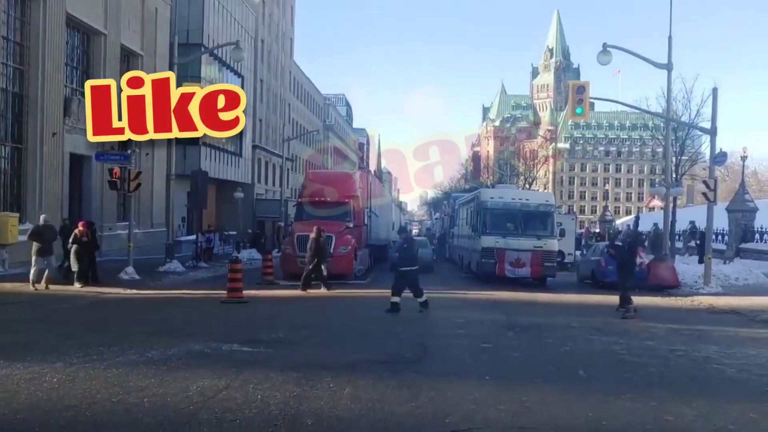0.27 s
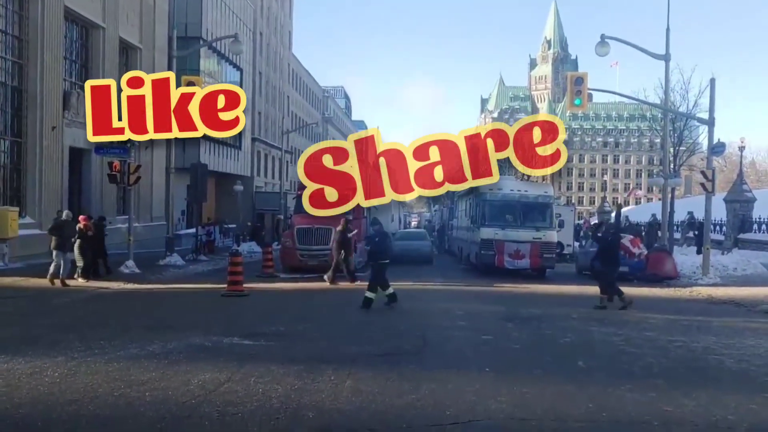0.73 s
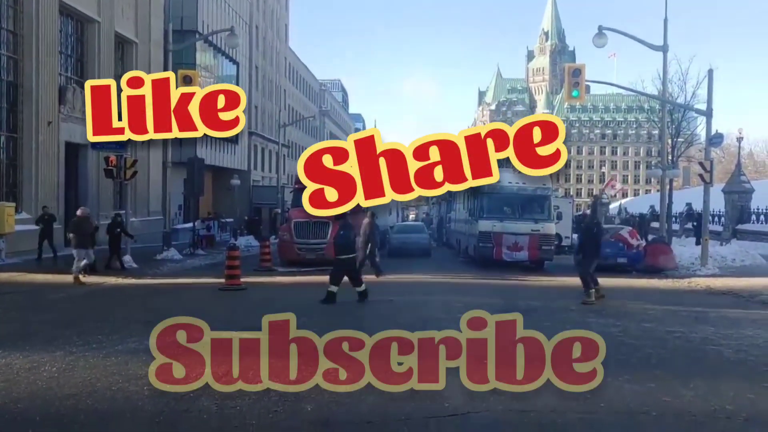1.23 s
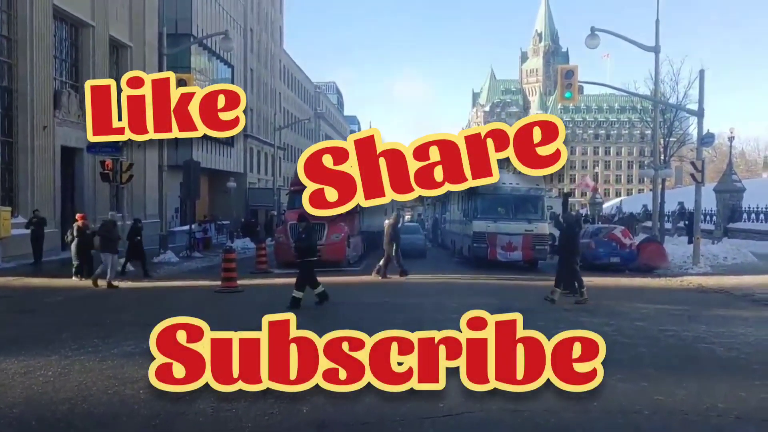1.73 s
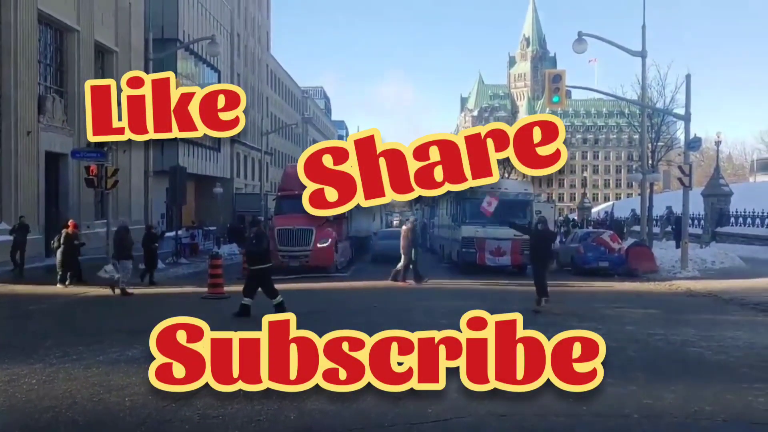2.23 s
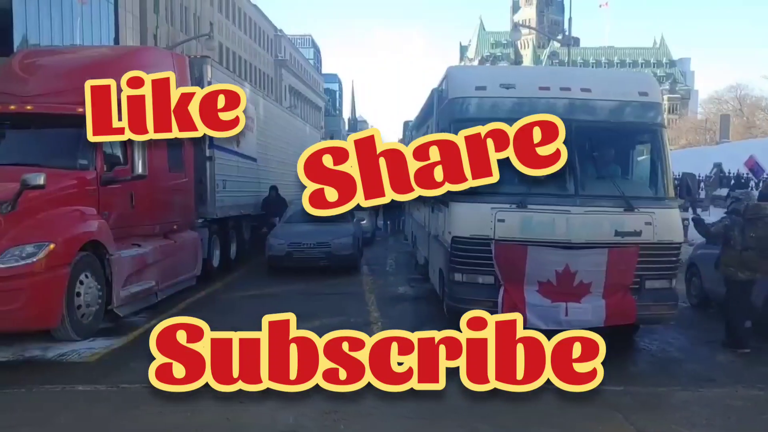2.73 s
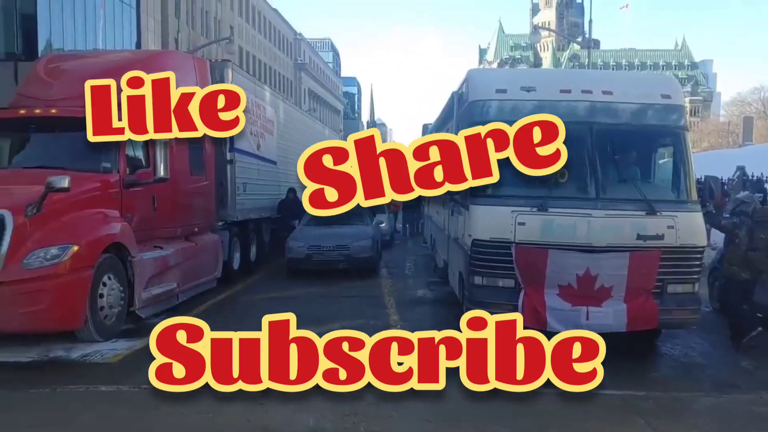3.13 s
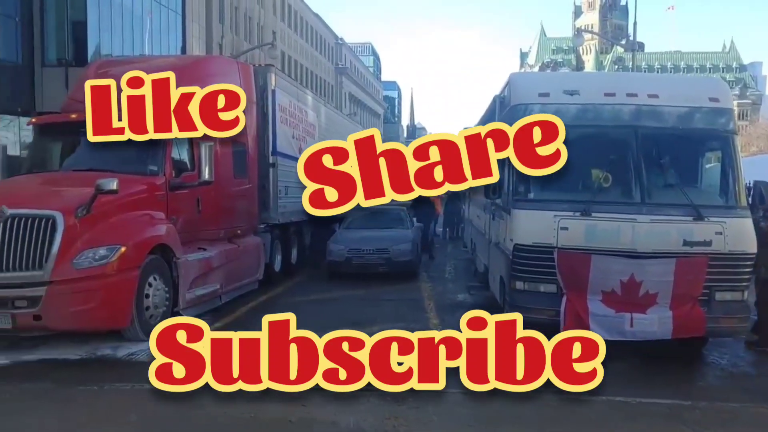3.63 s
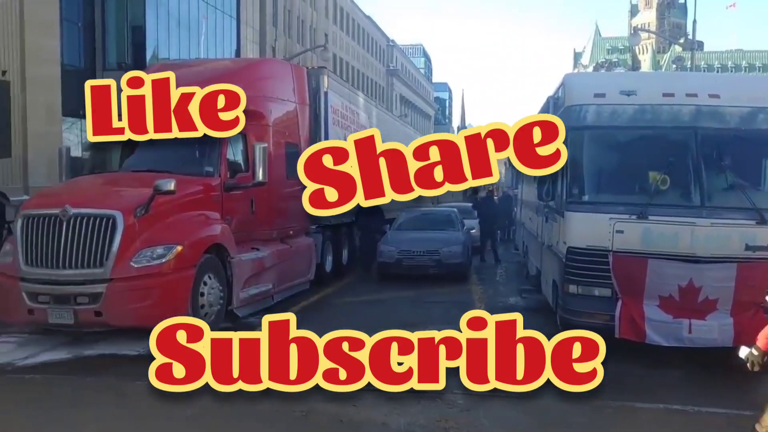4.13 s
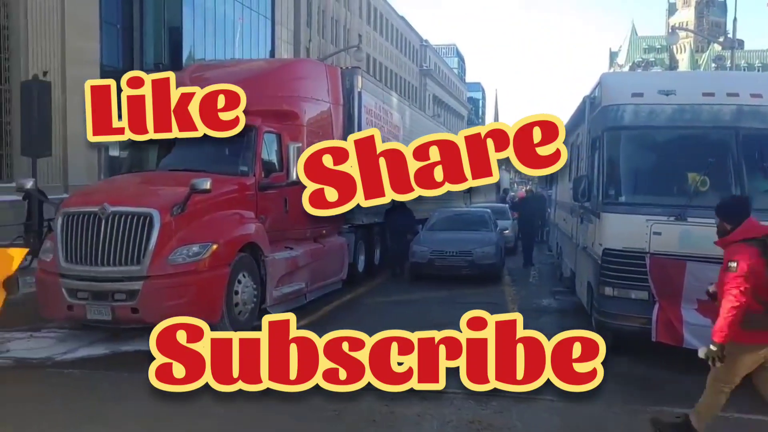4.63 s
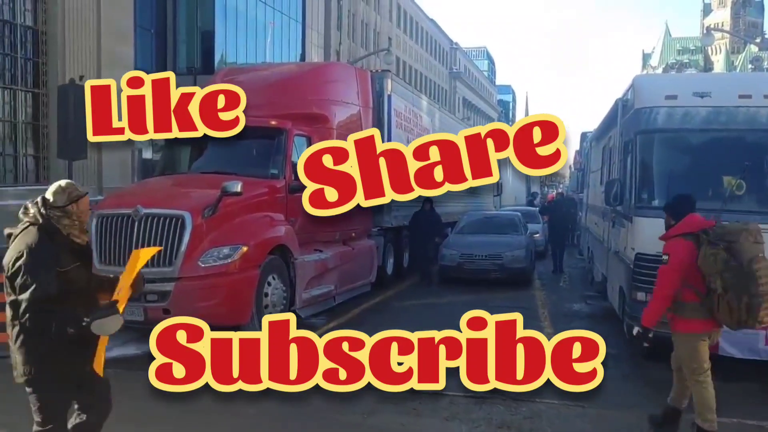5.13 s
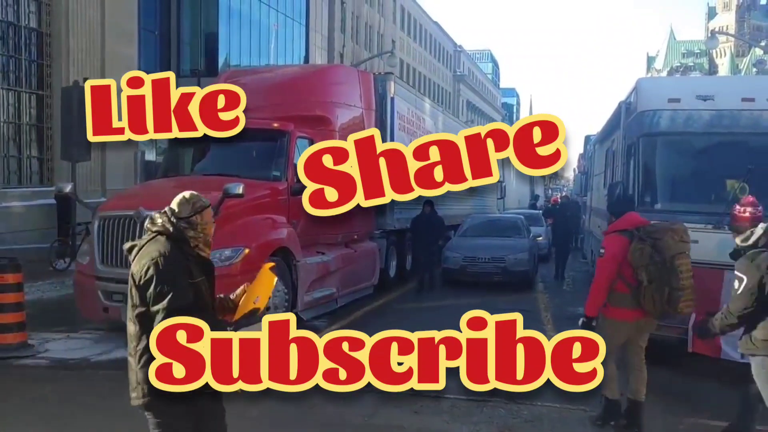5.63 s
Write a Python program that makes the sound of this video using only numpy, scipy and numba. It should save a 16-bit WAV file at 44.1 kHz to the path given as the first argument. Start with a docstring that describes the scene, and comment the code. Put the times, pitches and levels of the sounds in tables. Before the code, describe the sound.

On a city street with idling diesels, a distant three-trumpet truck horn holds a loud chord, stutters as a second horn joins, and cuts dead. After a very brief silence the chord fades in quickly, closer, with a bright single horn and rushing air. The chord stops near the end; the single horn breaks briefly and blows alone. Hand-held phone, stereo, outdoors.

```python
"""Truck air horns in a street of idling diesels, heard by a hand-held phone from two places, a silent cut between.
Far: a three-trumpet chord blows, a two-trumpet horn joins late, and the chord ends in a stutter.
Near: the sound fades in on the same chord, under a bright single trumpet close by, with its rush of air.
That trumpet breaks off as the chord ends, then blows alone. Horns and diesels are sums of drifting tones;
the air and the wash of the street are filtered noise."""
import sys
import numpy as np
from scipy import signal
from scipy.fft import rfft, irfft, next_fast_len
from scipy.io import wavfile
from scipy.ndimage import uniform_filter1d
from numba import njit

SR = 44100
rng = np.random.default_rng(int(sys.argv[2]) if len(sys.argv) > 2 else 0)


def generate_wav(signal):
    """Clip the signal to [-1, 1] and save it as 16-bit WAV at the path in sys.argv[1]."""
    frames = np.transpose(np.atleast_2d(signal))
    scaled = np.clip(frames, -1, 1) * 32767
    pcm = np.round(scaled).astype(np.int16)
    wavfile.write(sys.argv[1], SR, pcm)


N = 258867
STEP = 64  # samples between control values
TOP_HZ = 15720  # the phone passes nothing much above this

# Overtones of each trumpet, first to last; the swell comes of the phone moving:
# (level over the valve curve [dB], left minus right [dB], swell [dB/s])
FAR_LOW = [(-13, -2.5, -0.3), (-11, 3, -0.7), (-15.5, 0, -3), (-27, 3.6, -1), (-6.5, 9, -2),
           (-8.5, -1, 2.3), (-16.5, -12, 4), (-18.5, 8, -1.5), (-48, 4.5, -4)]
FAR_MID = [(-10.5, 0, -4.5), (0.0, -0.5, -0.8), (-3.5, 3, 3.0), (-1.6, -4, 1), (-17, -5, -2), (-17, 4, 0),
           (-19, -3, 3.8), (-37, -2, 1), (-32.5, -6, 1), (-36, -12, 3.4), (-32, 5, 3), (-32, 12, -1.3)]
FAR_TOP = [(-1.45, -4, -0.65), (-8.5, -0.6, 1), (-8.5, -5.5, 4.5), (-11, 4.5, -3.5), (-18.5, -9, 6.5),
           (-20.5, 2, 3.5), (-35, -5, 2), (-24.5, -14, 2), (-39.1, -7, 2), (-27, 14, -0.3), (-44, -4.4, 4),
           (-41, 10, -5), (-28, -9, 2), (-42.5, -1, -0.0), (-43, 11, 1.4), (-41.5, 11.4, 2),
           (-23.5, 14, -2), (-25.5, 15.7, -6)]
PAIR_LOW = [(1.5, -2.5, 0), (-11, 10, 0), (-11, -19, 0), (-19, -6, 0), (-15, 5, 0), (-20, 5, 0),
            (-19, 7, 0), (-21, 2.7, 0), (-20, -5, 0)]
PAIR_TOP = [(-5.5, -16, 0), (-9, 3, 0), (-5, -8, 0), (-6.5, 2, 0), (-12, 8, 0), (-16, -2, 0), (-15, -5, 0),
            (-18, -14, 0), (-17.5, 5, 0), (-28, 3, 0), (-12.5, 1, 0), (-27, -10, 0)]
NEAR_LOW = [(-10.5, -1, 3), (-17.5, -2, 2.5), (-6, 1.5, 0), (-17.5, 11, 0), (-11.5, -2, 2.5),
            (-18.5, -6, 4)]
NEAR_MID = [(-8.5, -0.7, 1.7), (-5, -0.5, 0.7), (-18, -6.3, 3.8), (-12.5, 0, 0.2), (-14.8, -3, 6.5),
            (-17.5, -4, 3.7), (-25, 0.6, 6.0), (-25, 5, 7.7), (-29, 0, 6.0), (-26, 7, 4.4),
            (-44, -2.0, 6.0), (-49, 1, 6.0)]
NEAR_TOP = [(-13.1, -2, 4), (-0.57, -1.7, -0.5), (-7.5, 0, 0), (-23.5, -4.3, -0.5), (-30.1, 0, -2),
            (-26, 9, 9), (-38.4, 14, 4.8), (-38.9, -1, 7), (-42, -1.5, 8), (-31, 3.4, 8), (-50, 4.5, 4),
            (-31.5, -3, 0), (-41.1, -1.8, 0), (-38, -7.6, 4), (-45.0, 3.2, -6), (-48, 16.2, 6.0),
            (-26, 17.5, 2), (-33, 21.2, 0.2)]
SOLO_EARLY = [(-11.5, -4.5, 0), (-11.5, 3, 0), (-12, -12, 0), (-7, -1, 0), (-11, -2, 1), (-6, 11, .5),
              (.9, 7.5, -.5), (-6, 9.5, 6), (-7.5, 11, -1), (-17, -4, -2), (-23, 4, 1.5), (-15, 3.4, 3),
              (-19, 2, 2), (-14.5, -4, -1), (-18.5, -7, 2), (-14, 9, 1), (-12.5, -7, -1.5), (-19, -5, -5),
              (-19, 5, -5), (-20.5, 7, -5), (-16, 13, 1.5), (-17.7, 12.3, 6), (-9, 22, .4), (-10, 17, 5),
              (-13.5, 20.4, 4), (-20, 9, 2)]
# The single trumpet after its break, when the phone has turned and hears another colour: same columns
SOLO_LATE = [(-6, -3, -3), (-11.5, 3, 0), (-11, -12.6, -1), (-7, 1, 0.5), (-4, -9, -8), (-2.8, 6, 0.2),
             (1.6, 3.5, 2), (-4.1, 16, 0), (-9, 1.8, -1), (-19.5, 9, 4.0), (-20, -8, 8), (-9, 4.5, -2),
             (-13.5, -2, -3), (-10.5, 6, -2.2), (-25, -0.8, 1.2), (-11.5, 19, -3), (-16.7, -12, 1),
             (-20.5, 9, 4), (-18.7, -17, 5), (-16, 9, 1), (-11.9, 17, -10), (-12.5, 12, -16),
             (-10, 19.5, 0), (-4, 19, -14), (-10.5, 22.9, 14), (-17, 9, 9)]
# The single trumpet's upper overtones: (frequency [Hz], level over the valve curve [dB], left minus right [dB])
SOLO_TREBLE = [(7150, -19, 8), (7560, -29.5, 0), (8520, -17.5, -5), (9200, -17.5, 5), (9940, -21, -2),
               (11530, -40, 3), (11900, -20.5, 8), (13400, -25, 2), (15600, -23, -3)]
# Loud far trumpets blend into sum tones: (level over the valve curve [dB], left minus right [dB], swell [dB/s])
SUM_TONES = [(-13.5, -5, -1.5), (-20, 2.6, -1), (-20.5, 3, -4.5), (-17, -6, 0)]
# What each sum tone adds up: (multiple of low pitch, of mid pitch, of top pitch)
SUM_MULTIPLES = [(2, 3, 0), (0, 4, 1), (3, 2, 0), (0, 3, 2)]

# Blasts of each horn: (valve opens [s], valve shuts [s], level at first [dB], at last [dB],
# brightness at first [dB/octave], at last [dB/octave])
FAR_BLASTS = [(0.039, 2.165, -18.2, -18, -2.3, -2.2), (2.284, 2.395, -21, -18.5, -2, -2.5),
              (2.474, 2.6, -21.5, -20.6, -3, -2)]
PAIR_BLASTS = [(2.1, 2.6, -25, -20.5, 1.4, 0.32)]
NEAR_BLASTS = [(2.599, 5.001, -13.5, -15.5, 3.1, -1.2)]
SOLO_BLASTS = [(2.594, 4.78, -26, -23, 1.3, 0.85), (5.029, 5.898, -18, -16, -0.38, -0.85)]
# The hand sways between the near horns: (time [s], chord level [dB], single trumpet level [dB])
SWAY = [(2.9, 0.5, -1.4), (3.3, 0.7, 0.5), (4.0, 0.9, -0.5), (4.2, -2, -1.5), (4.36, -3.5, 1.1),
        (4.57, 0.7, 0.8), (4.78, -1.4, -1.6), (5.0, 0.2, -0.5), (5.5, -0.1, 0.1)]

# Air rushing from the single trumpet, before its blow level: (frequency [Hz], density [dB per Hz])
AIR = [(500, -79), (900, -67), (2100, -67), (2700, -70), (4000, -73), (5500, -74), (6500, -69), (7600, -78),
       (9000, -72), (11000, -85), (13000, -71), (15500, -72)]
# How the phone's two ports share all noise: (frequency [Hz], left minus right [dB])
PORTS = [(3000, 0.5), (5500, -6), (6500, 20.5), (7600, -6), (9000, 5), (11000, -4), (13000, 16.5),
         (15500, -4)]

# Idling diesels, successive multiples of the repeat rate: (level over the rumble [dB], left minus right [dB])
IDLE_FAR = [(-44, -1), (-43.5, 2), (-32, -0.5), (-40.5, -1), (-40.5, -2), (-50.5, 1), (-56, 7), (-45, 4),
            (-49.5, -2)]
IDLE_NEAR = [(-53, 0), (-45, 0), (-62, 0), (-35, 0), (-38.5, 0), (-39, 0), (-41.5, 0), (-51, 0), (-41.5, 0),
             (-41.5, 0), (-40, 0), (-43.5, 0)]
# Thin wavering tones in the distance: (frequency [Hz], level [dB], start [s])
DISTANT = [(500.7, -45, 0), (1675, -41, 2.6), (1218.7, -45, 4.9), (332.9, -43, 4.9)]
# Wash of the street, before its background level: (frequency [Hz], density [dB per Hz])
STREET = [(30, -60), (50, -53), (90, -49.5), (150, -58), (220, -58.5), (450, -61.5), (1450, -58.5),
          (2100, -64), (2700, -73), (4000, -76), (5500, -82), (6500, -78.5), (7600, -87.5), (9000, -78),
          (11000, -86), (13000, -86), (15500, -82)]
# Background level as heard at the phone: (time [s], rumble [dB], middle [dB], treble [dB])
BACKGROUND_LEVEL = [(0, 7.5, 7.5, 5), (.15, 2.5, 3.5, 1.5), (.7, 1, -0.5, 1), (1.53, 0, 2, 3),
                    (1.62, 0, 4, -2), (2.1, .5, 3.5, -1.5), (2.49, 0, 0, 5), (2.9, -8.5, -9, 8),
                    (4.2, -8, -7.5, 7), (4.85, -5.5, 0, 6.5), (5.15, -3.5, -9, 5), (5.87, -2, -4, 6.5)]

# Pitches of the trumpets [Hz], low to top; the single trumpet before and after its break
FAR_HZ, PAIR_HZ = (266.1, 321.25, 379.55), (331.8, 405.7)
NEAR_HZ, SOLO_HZ = (266.5, 322.05, 379.85), (267.1, 267.27)
IDLE_HZ = (26.65, 21.4)  # repeat rate of the diesels, far and near

# Stretches in which each source is computed (from [s], to [s])
FAR_S, PAIR_S, NEAR_S, CHORD_S = (0, 2.5), (1.9, 2.5), (2.6, 5.87), (2.6, 5.3)
SOLO_S = ((2.6, 4.92), (4.92, 5.87))
SOLO_LAG_S = -.00002  # the left port hears the single trumpet first

# Valve of each horn: (attack [s], first drop [dB], over [s], then echoes fading [dB/s],
# dulling [dB/octave for each dB lost])
FAR_VALVE, PAIR_VALVE = (.015, 7.9, 0.0243, 132, .15), (0.15, 8, .03, 130, .01)
NEAR_VALVE, SOLO_VALVE = (.03, 11.6, .045, 170, .3), (0.076, 6.7, 0.032, 260, 0.16)
SHUT_DB = 38  # a blast rises from this far below its level
BLAT_DB, BLAT_DULL, BLAT_S = 3, 3.8, 0.046  # a blast opens with a loud, dark blat (dB, dB/octave, decay s)

CUT_S = 2.4925  # the far place is cut here
BACK_S, FADE_S, FADE_BEND = 2.605, .255, .55  # the sound returns, quickly at first


def far_chord():
    """Three distant trumpets; every reed gives a row of overtones, and the loud reeds make sum tones."""
    hz, rows = overtones(FAR_HZ, (FAR_LOW, FAR_MID, FAR_TOP))
    hz = np.append(hz, np.array(SUM_MULTIPLES) @ FAR_HZ)
    rows = np.vstack([rows, SUM_TONES])
    curve = valve(FAR_BLASTS, FAR_VALVE)
    return tones(FAR_S, hz, rows, curve, .00011, drift=0.12, flutter=0.075, surge=.03, jitter=0.0007993)


def far_pair():
    """A two-trumpet horn whose slow valve swells in beside the far chord."""
    hz, rows = overtones(PAIR_HZ, (PAIR_LOW, PAIR_TOP))
    return tones(PAIR_S, hz, rows, valve(PAIR_BLASTS, PAIR_VALVE), .0001, drift=0.32, flutter=0.085)


def near_chord():
    """The three-trumpet chord from the near place, its level swayed by the hand."""
    when, chord_db, _ = np.transpose(SWAY)
    curve = valve(NEAR_BLASTS, NEAR_VALVE, np.interp(control_times(), when, chord_db))
    hz, rows = overtones(NEAR_HZ, (NEAR_LOW, NEAR_MID, NEAR_TOP))
    return tones(CHORD_S, hz, rows, curve, 0.0002, drift=0.13, flutter=0.09, surge=0.015, jitter=.0008)


def single_trumpet():
    """One bright reed close by, with overtones up to the phone's limit, and the air that drives it."""
    when, _, solo_db = np.transpose(SWAY)
    curve = valve(SOLO_BLASTS, SOLO_VALVE, np.interp(control_times(), when, solo_db))
    at, db, pan_db = np.transpose(SOLO_TREBLE)
    out = air_rush(curve)
    for span, pitch, lower in zip(SOLO_S, SOLO_HZ, (SOLO_EARLY, SOLO_LATE)):
        upper = pitch * np.arange(len(lower) + 1, int(TOP_HZ / pitch))
        treble = np.transpose([np.interp(upper, at, db), np.interp(upper, at, pan_db), 0 * upper])
        rows = np.vstack([lower, treble])
        hz = pitch * np.arange(1, len(rows) + 1)
        out = out + tones(span, hz, rows, curve, SOLO_LAG_S, drift=0.17, flutter=0.2,
                          surge=0.010075, jitter=.0012)
    return out


def air_rush(curve):
    """Turbulent air from the single trumpet: noise pulsing once a cycle, its level uneven in each band."""
    t = np.arange(N) / SR
    when, level_db, _ = curve.T
    # the rush follows half the horn's level change in dB
    blow = undb(0.5 * (np.interp(t, when, level_db) + 22.2).clip(-40, 1.5)) * (t > CUT_S)
    edges_hz = (100, 2500, 5000, 7500, 10500, 30000)
    air = 0
    for lo, hi in zip(edges_hz, edges_hz[1:]):
        air = air + undb(3.5 * wander(9)) * noise(AIR, lo, hi)
    pulse = 1 + .5 * np.cos(2 * np.pi * SOLO_HZ[0] * t)
    return blow * pulse * air


def idling_diesels():
    """Engines repeating at a low rate: a row of multiples that follows the background's rumble level."""
    at, rumble_db, *_ = np.transpose(BACKGROUND_LEVEL)
    curve = np.transpose([at, rumble_db, 0 * at])
    out = np.zeros((2, N))
    for span, rate, rows in zip((FAR_S, NEAR_S), IDLE_HZ, (IDLE_FAR, IDLE_NEAR)):
        out += tones(span, *overtones([rate], [rows]), curve, 0, drift=0.24, flutter=0.15)
    return out


def distant_tones():
    """Thin single tones far off, each rising at its start and wavering strongly."""
    out = np.zeros((2, N))
    for hz, db, start in DISTANT:
        span = FAR_S if start < CUT_S else NEAR_S
        rise = [(start, -40, 0), (start + 0.12, 0, 0)]
        out += tones(span, np.array([hz]), [(db, 0)], rise, 0, drift=1.0, flutter=.1)
    return out


def street_wash():
    """The wash of the street: three bands of noise, each with its own level as heard and a slow wander."""
    t = np.arange(N) / SR
    at, *columns = np.transpose(BACKGROUND_LEVEL)
    edges_hz = (5, 230, 2600, 30000)
    out = np.zeros((2, N))
    for band_db, lo, hi in zip(columns, edges_hz, edges_hz[1:]):
        level_db = np.interp(t, at, band_db) + 1.2 * wander(4.7)
        out += undb(level_db) * noise(STREET, lo, hi)
    return out


def valve(blasts, rule, sway_db=0):
    """Rows (time, level dB, brightness): a blast rises, holds, drops and fades duller; the loudest counts."""
    s = control_times()
    attack_s, drop_db, drop_s, fade_db_s, dull = rule
    levels, brights = [], []
    for t0, t1, db0, db1, bright0, bright1 in blasts:
        lost = SHUT_DB * ((t0 - s) / attack_s).clip(0) ** 2
        lost += drop_db * ((s - t1) / drop_s).clip(0, 1)
        lost += fade_db_s * (s - t1 - drop_s).clip(0)
        blat = np.exp(-(s - t0).clip(0) / BLAT_S)
        levels.append(np.interp(s, (t0, t1), (db0, db1)) + BLAT_DB * blat - lost.clip(0, 90))
        bright = np.interp(s, (t0, t1), (bright0, bright1))
        brights.append(bright - BLAT_DULL * blat - dull * lost.clip(0, SHUT_DB))
    loudest = np.argmax(levels, axis=0)
    return np.transpose([s, np.choose(loudest, levels) + sway_db, np.choose(loudest, brights)])


def overtones(pitches, tables):
    """Whole multiples of each pitch, one for each table row, joined with all the rows."""
    hz = [pitch * np.arange(1, len(table) + 1) for pitch, table in zip(pitches, tables)]
    return np.concatenate(hz), np.concatenate(tables)


def tones(span, hz, rows, curve, lag_s, drift, flutter, surge=0, jitter=0):
    """Tones heard over several paths: the swaying phone makes each drift, echoes blur it a little."""
    a, b = int(span[0] * SR) // STEP, min(int(span[1] * SR), N) // STEP
    s = np.arange(a, b + 1) * STEP / SR
    db, pan_db, *swell = np.transpose(rows)
    at, level_db, bright_db = np.transpose(curve)
    level = undb(np.interp(s, at, level_db))

    # a reed goes sharp while the valve opens or shuts, and its pitch trembles
    change = np.clip(abs(np.gradient(np.log(level), s)) / 30, 0, 1)
    sharp = 1 + surge * uniform_filter1d(change, size=36)
    sharp = sharp + jitter * walk(24.9, count=1, size=len(s))[0].real
    phase = 2 * np.pi * np.cumsum(sharp) * STEP / SR

    tilt_db = np.outer(np.log2(hz / 800), np.interp(s, at, bright_db))
    gain = level * undb(db[:, None] + tilt_db)
    if swell:
        gain = gain * undb(np.outer(swell[0], s - s.mean()))

    # short waves reach the two ports by different paths
    apart = np.clip(hz / 3000, .03, .9)[:, None]
    drift = drift * (1 + 1.56 * apart)

    def path():
        return drift * walk(2.54, len(hz), len(s)) + flutter * walk(40, len(hz), len(s))

    both = path()
    start = 2 * np.pi * rng.random(len(hz))
    sides = []
    for side in (1, -1):  # left, right
        port = undb(side * pan_db / 2) * np.exp(1j * (start - side * np.pi * hz * lag_s))
        port /= np.sqrt(np.cosh(pan_db * np.log(10) / 20) / 2)  # panning keeps the total power
        blur = 1 + np.sqrt(1 - apart) * both + np.sqrt(apart) * path()
        sides.append(gain * port[:, None] / np.sqrt(1 + drift ** 2) * blur)
    out = np.zeros((2, N))
    out[:, a * STEP:b * STEP] = partials(phase, hz, np.array(sides), STEP)
    return out


@njit
def partials(phase, hz, gain, step):
    """Sum of tones at hz times the phase; phase and complex gains (channel, tone, time) glide between steps."""
    out = np.zeros((2, (len(phase) - 1) * step))
    for k in range(len(hz)):
        for j in range(len(phase) - 1):
            z = np.exp(1j * hz[k] * phase[j])
            turn = np.exp(1j * hz[k] * (phase[j + 1] - phase[j]) / step)
            for i in range(step):
                for c in range(2):
                    glide = gain[c, k, j] + (gain[c, k, j + 1] - gain[c, k, j]) * (i / step)
                    out[c, j * step + i] += (z * glide).real
                z *= turn
    return out


def noise(table, lo_hz, hi_hz):
    """A soft-edged band of noise of the given density; alike left and right only in the bass."""
    size = next_fast_len(N)
    f = np.fft.rfftfreq(size, 1 / SR) + 1
    mid, side = rfft(rng.standard_normal((2, size)))
    share = np.clip((f / 1100) ** 2.0, .003, .48)  # power that differs between the ports
    at, density_db = np.transpose(table)
    colour = undb(np.interp(np.log(f), np.log(at), density_db)) * np.sqrt(SR / 2)
    colour *= np.sqrt(1 / (1 + (f / hi_hz) ** 4) - 1 / (1 + (f / lo_hz) ** 4))
    pan_db = np.interp(f, *np.transpose(PORTS))
    ports = []
    for k in (1, -1):  # left, right
        mixed = np.sqrt(1 - share) * mid + k * np.sqrt(share) * side
        ports.append(irfft(colour * undb(k * pan_db / 2) * mixed, size)[:N])
    return np.array(ports)


def walk(rate, count, size):
    """Slow complex chance of unit spread, one row each, at the control rate; smoothed over 1/rate s, twice."""
    k = max(int(SR / STEP / rate), 1)
    z = rng.standard_normal((2, count, size))
    for _ in range(2):
        z = uniform_filter1d(z, k, mode="wrap")
    return (z[0] + 1j * z[1]) * np.sqrt(.75 * k)


def wander(rate):
    """One real slow walk, held over each control step to fill every sample."""
    return np.repeat(walk(rate, count=1, size=N // STEP + 1)[0].real, STEP)[:N]


def control_times():
    """Times of the control values in seconds."""
    return np.arange(N // STEP + 1) * STEP / SR


def undb(db):
    """Amplitude factor of a level in dB."""
    return 10 ** (np.asarray(db) / 20)


def scene():
    """Both places: the horns, then the street behind them."""
    horns = far_chord() + far_pair() + near_chord() + single_trumpet()
    return horns + idling_diesels() + distant_tones() + street_wash()


def record(dry):
    """The phone bends loud peaks a little; the sound is cut dead, fades in again, and loses its top."""
    t = np.arange(N) / SR
    bent = np.tanh(.8 * (dry + 0.014 * dry ** 2)) / 0.82
    bent = signal.sosfilt(signal.butter(2, 25, "high", fs=SR, output="sos"), bent)
    gate = np.where(t < CUT_S, 1, .04 * np.exp(-(t - CUT_S) / .007))  # a faint, brief tail at the cut
    gate = gate + ((t - BACK_S) / FADE_S).clip(0, 1) ** FADE_BEND
    return signal.sosfilt(signal.ellip(12, .2, 60, TOP_HZ, fs=SR, output="sos"), bent * gate)


dry = scene()
out = record(dry)
generate_wav(out)
```